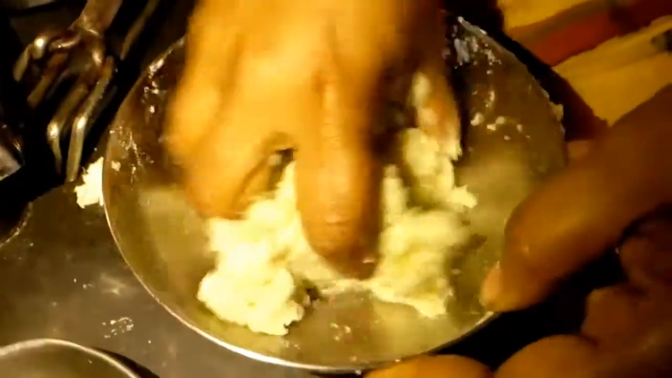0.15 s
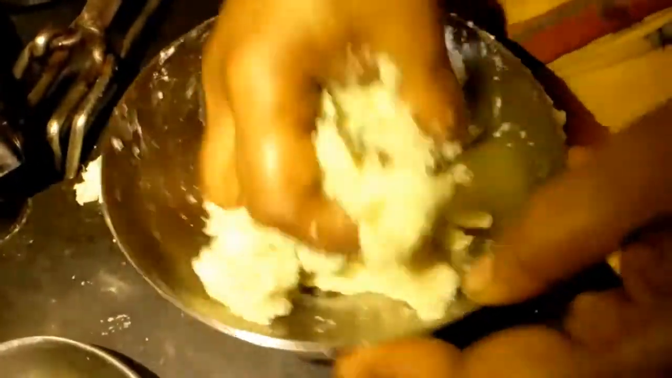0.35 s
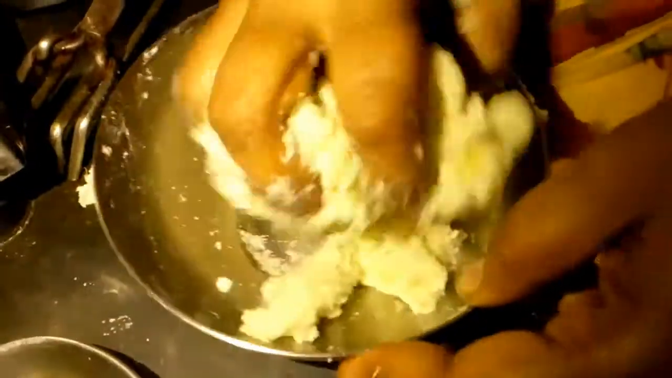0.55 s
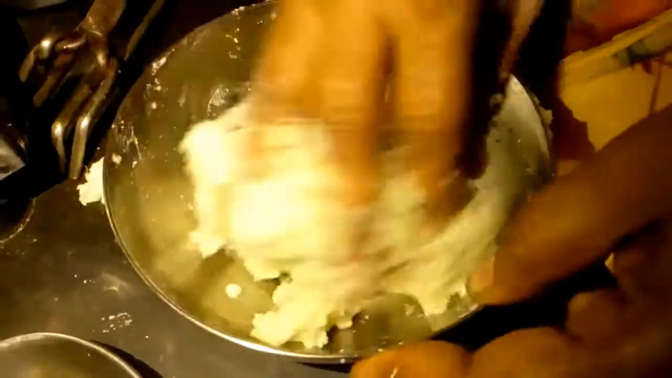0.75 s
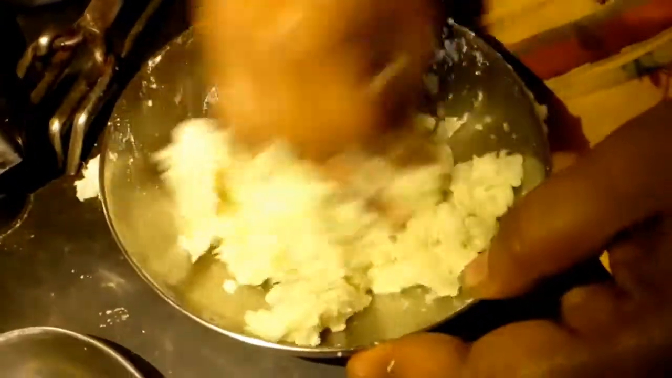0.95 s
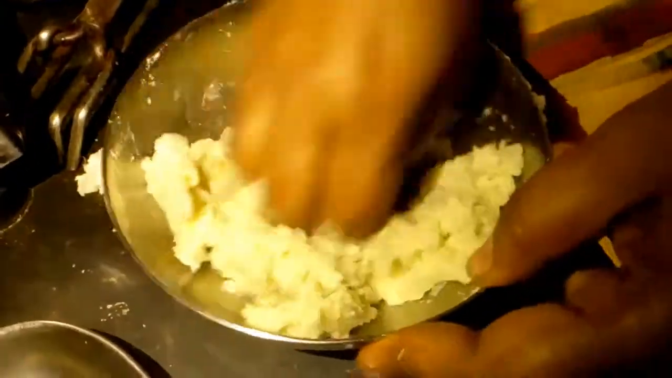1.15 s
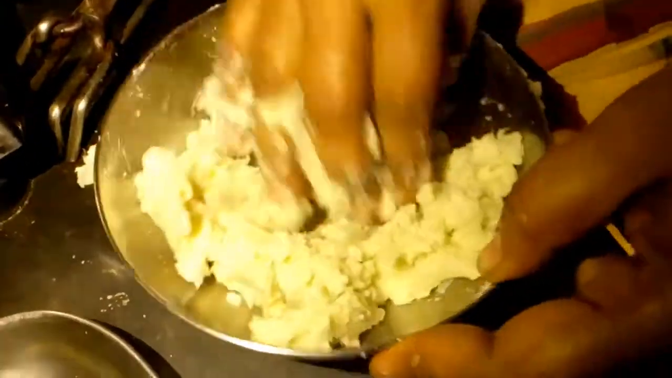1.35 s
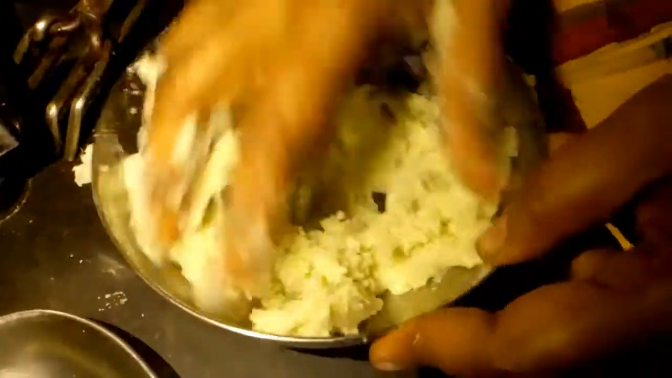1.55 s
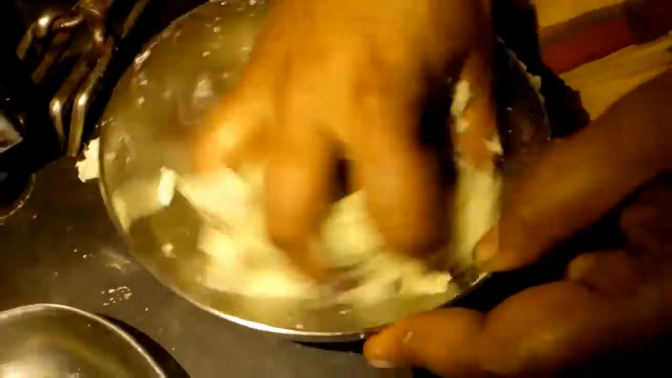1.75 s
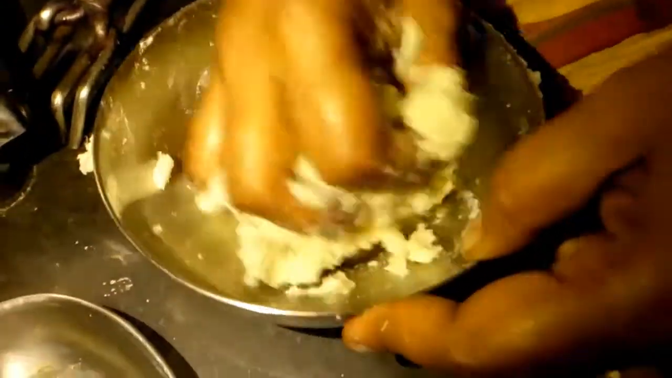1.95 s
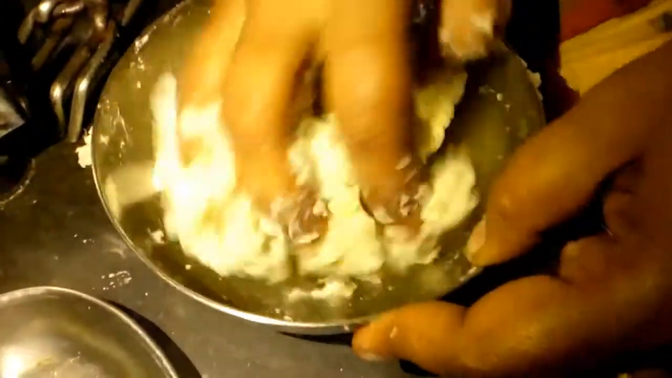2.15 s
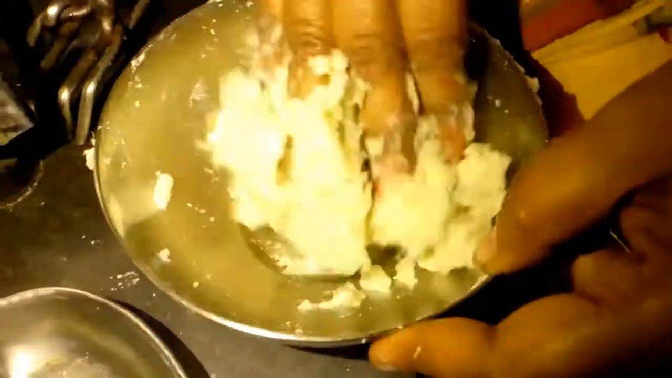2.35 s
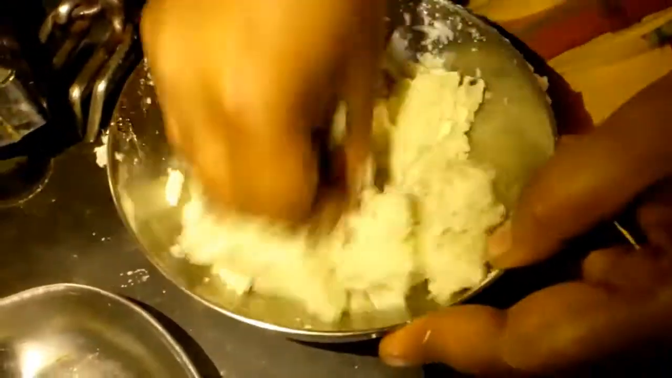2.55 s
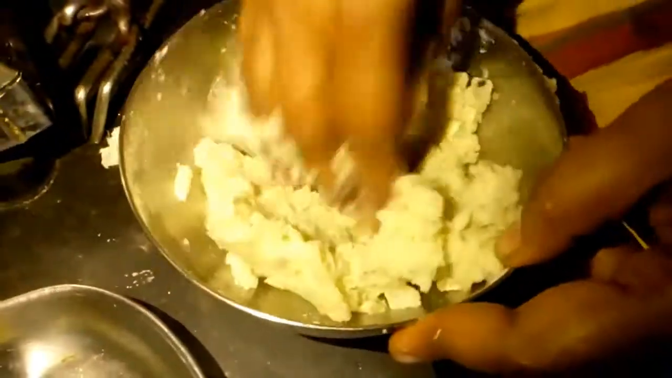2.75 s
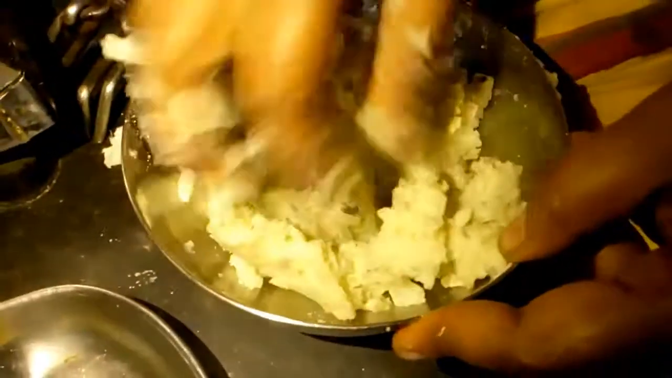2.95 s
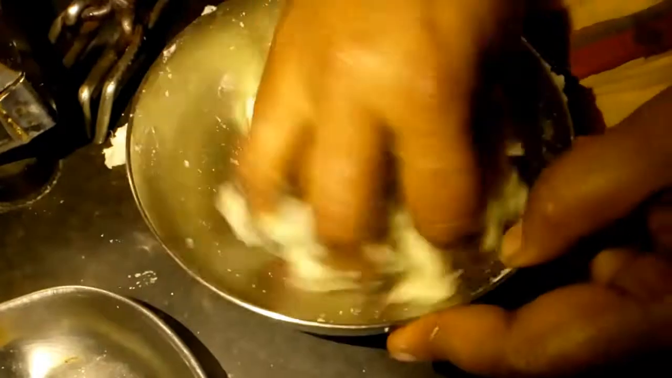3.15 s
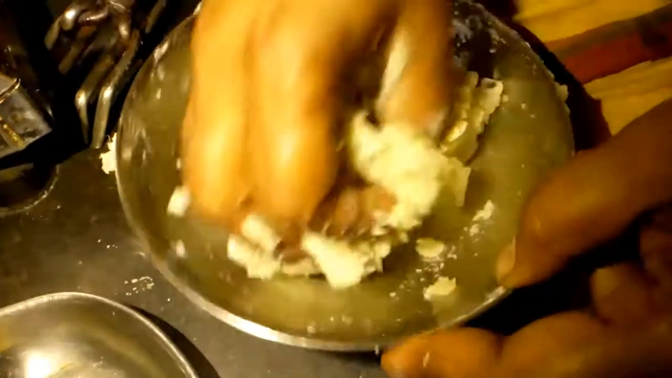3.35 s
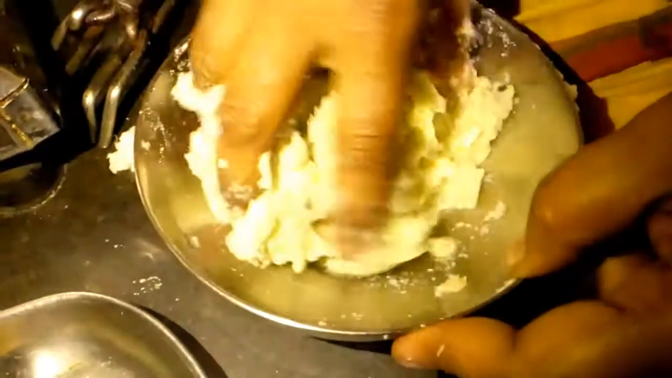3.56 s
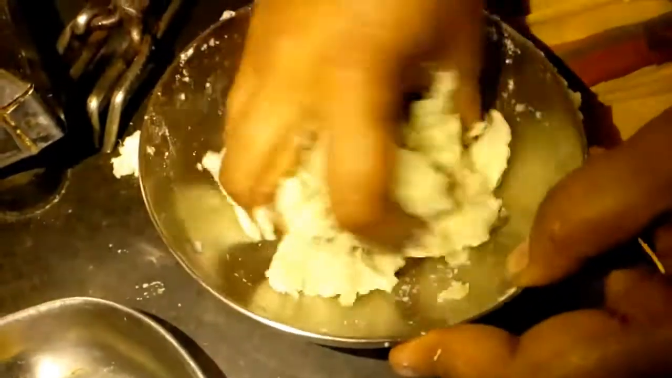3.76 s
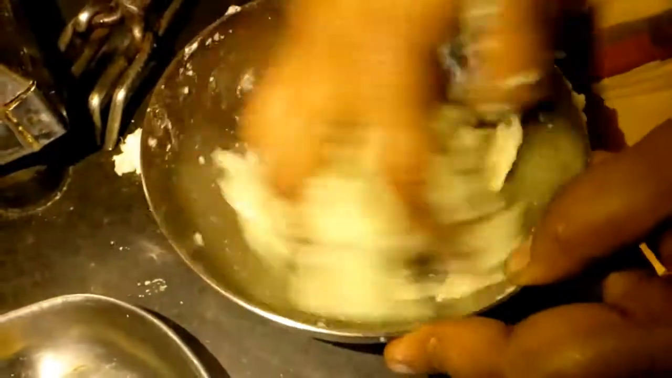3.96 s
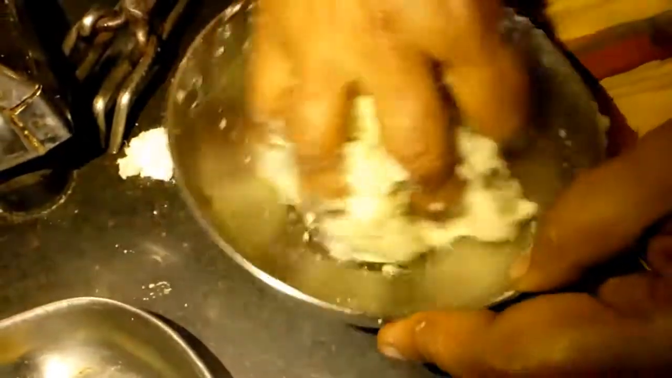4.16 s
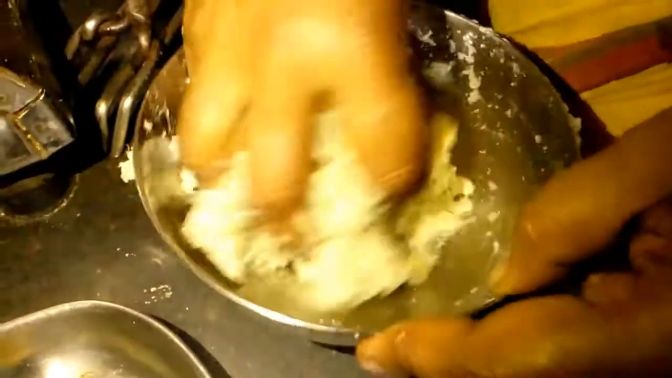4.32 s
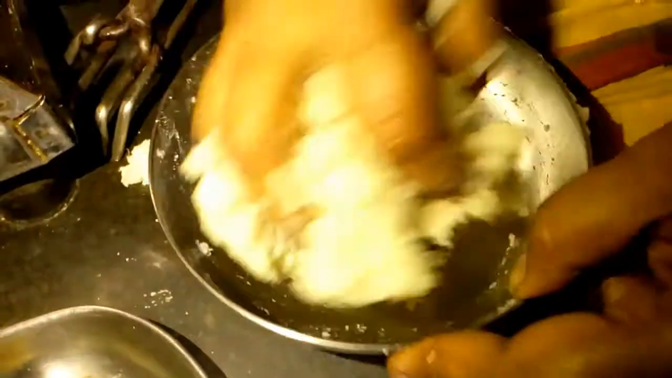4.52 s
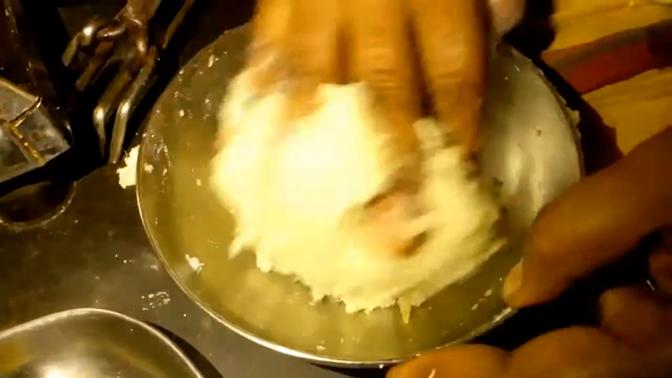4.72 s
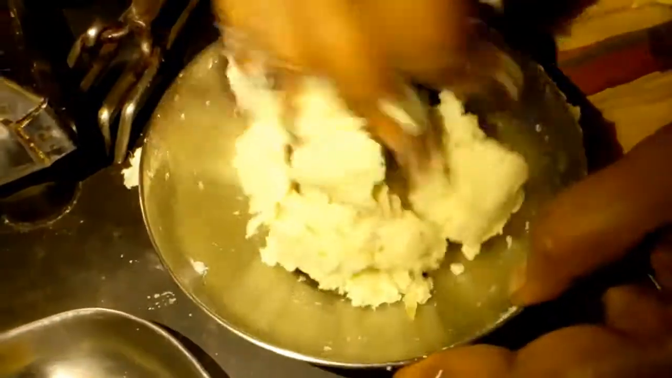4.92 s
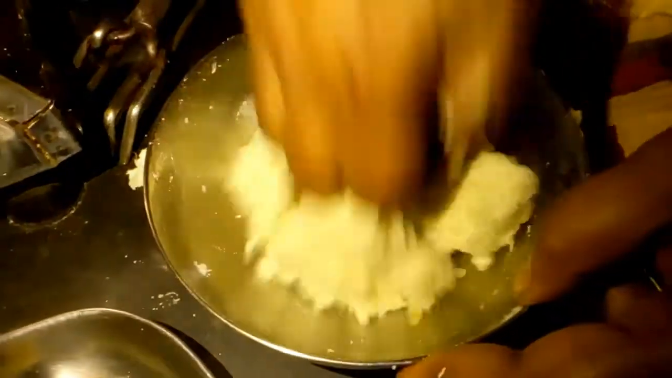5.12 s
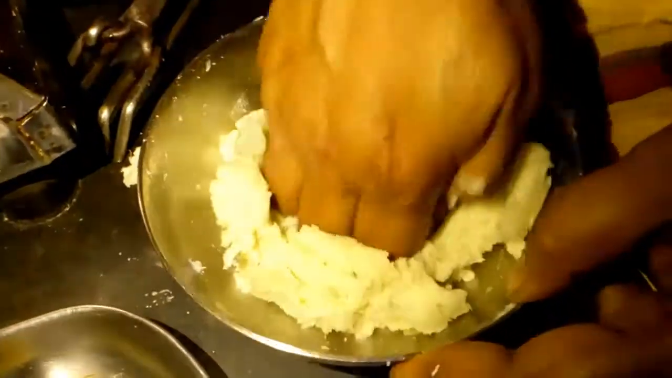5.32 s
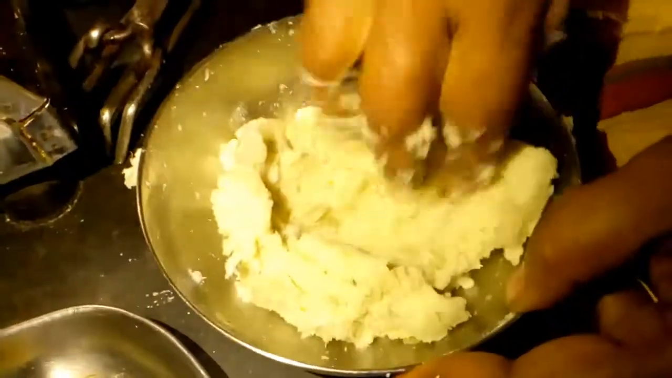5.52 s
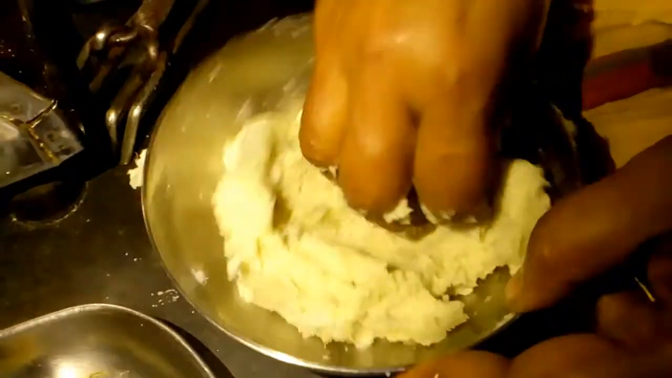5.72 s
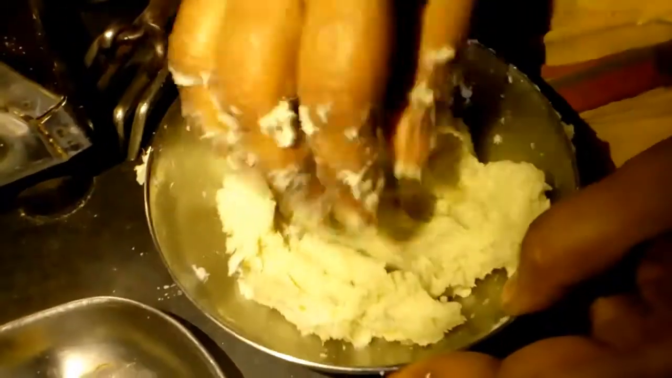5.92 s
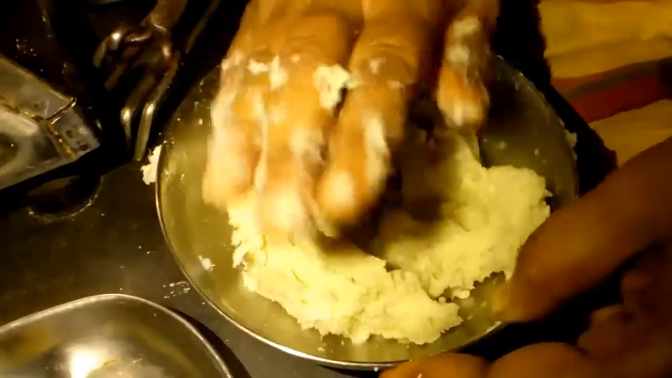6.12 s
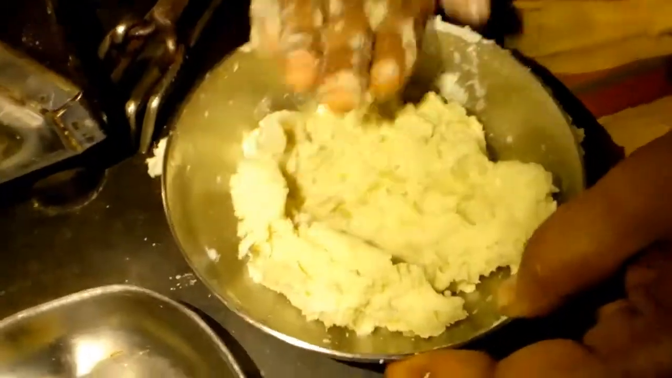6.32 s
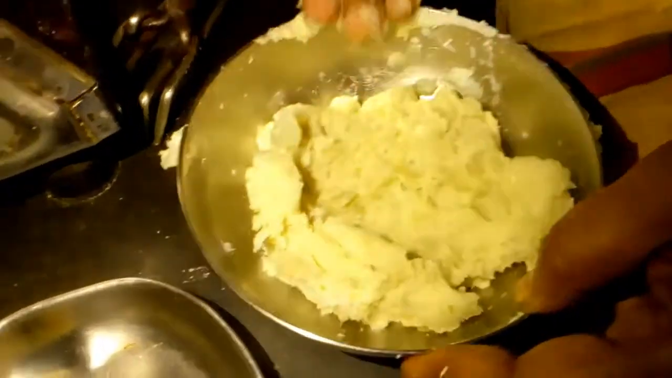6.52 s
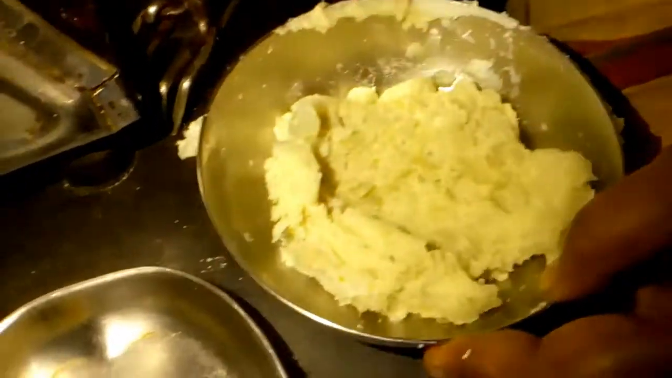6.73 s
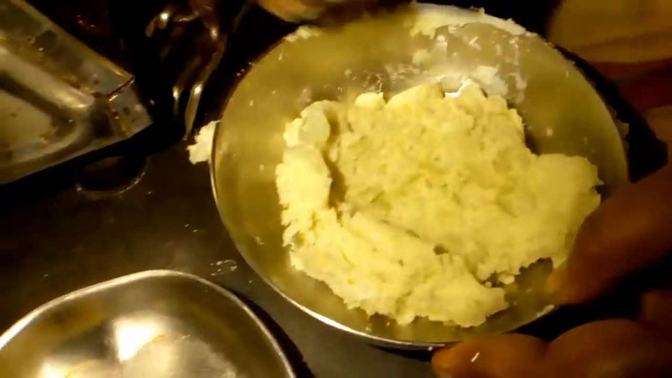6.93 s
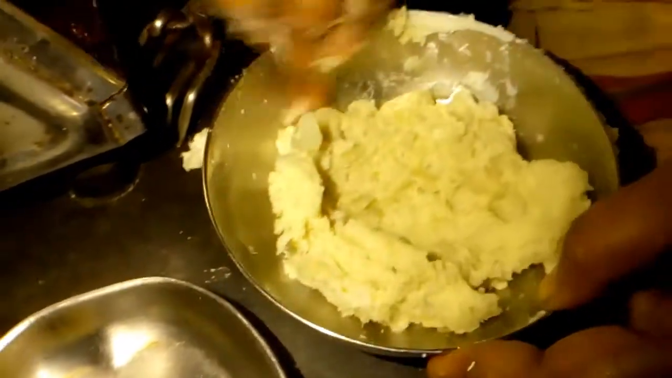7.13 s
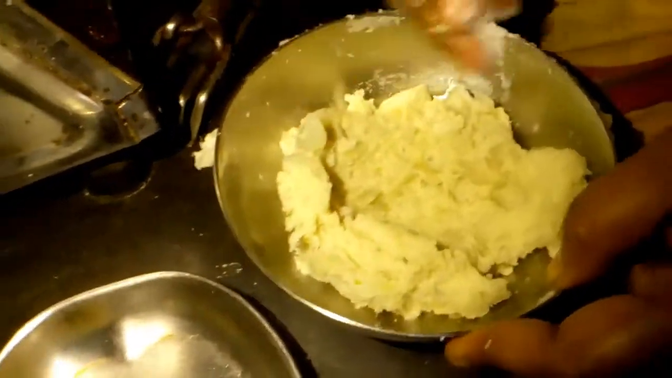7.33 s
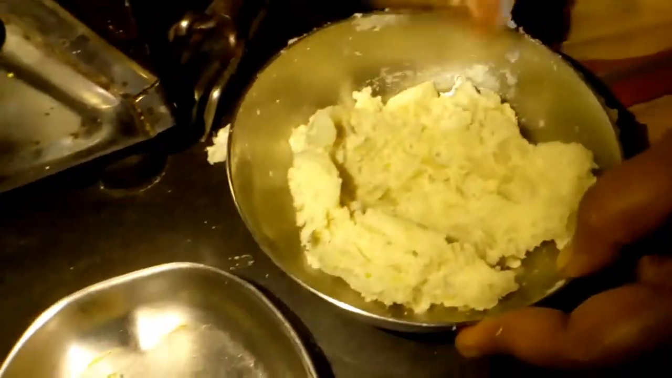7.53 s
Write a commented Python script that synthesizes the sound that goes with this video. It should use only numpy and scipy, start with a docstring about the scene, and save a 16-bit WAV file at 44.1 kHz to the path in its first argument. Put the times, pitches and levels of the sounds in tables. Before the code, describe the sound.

In a quiet kitchen a cricket keeps up a rapid, high chirping over low room noise. Close by, right of centre, a steel bowl taps and knocks irregularly against the counter as dough is worked in it, each ring quickly deadened. The dough rubs softly on the metal and now and then snaps off the fingers. Several harder knocks come in the second half, followed by a few gentler taps.

```python
"""A steel bowl rocks and knocks on a stone counter as a hand kneads crumbly dough in it.
Each knock rings the dough-damped bowl; dough rubs the steel and snaps as it unsticks from the fingers.
Behind it lie quiet kitchen tone, faint far whistles and a cricket beyond the wall, whose wing strokes
chirp in two falling syllables. A spaced pair of microphones hears the bowl to the right."""
import sys
import numpy as np
from scipy import signal
from scipy.fft import rfft, irfft, next_fast_len
from scipy.io import wavfile
from scipy.ndimage import uniform_filter1d

SR = 44100
rng = np.random.default_rng(int(sys.argv[2]) if len(sys.argv) > 2 else 0)


def unload_wav(signal):
    """Save mono or channel-first audio to the path in sys.argv[1] as 16-bit WAV at rate SR, clipped to [-1, 1]."""
    wavfile.write(
        sys.argv[1],
        SR,
        np.round(np.clip(np.atleast_2d(signal).T, -1, 1) * 32767).astype(np.int16),
    )


N = 338688
T = np.arange(N) / SR
FFT_SIZE = next_fast_len(N + SR)
HZ = np.arange(FFT_SIZE // 2 + 1) * SR / FFT_SIZE


def undb(db):
    """Decibels to gain."""
    return 10 ** (np.asarray(db) / 20)


def on_log(points, hz):
    """Reads a curve of (f/Hz, value) points on a log-frequency axis."""
    f, value = np.transpose(points)
    return np.interp(np.log(hz + 1), np.log(f), value)


def shape(x, gain):
    """Filters with one gain for each frequency in HZ."""
    return irfft(rfft(x, FFT_SIZE) * gain, FFT_SIZE)[..., :N]


def unit(x):
    """Scales to an RMS of 1."""
    return x / np.sqrt(np.mean(x ** 2))


def band(x, hz, width_hz):
    """A resonance of gain 1."""
    return signal.lfilter(*signal.iirpeak(hz, hz / width_hz, SR), x)


def steep_band(x, hz, width_hz):
    """The same resonance twice over, at an RMS of 1."""
    return unit(band(band(x, hz, width_hz), hz, width_hz))


def fade(t, t60):
    """A decay of 60 dB in t60 seconds."""
    return np.exp(-np.log(1000) * t / t60)


def add(track, start, sound):
    """Mixes a sound in at start seconds."""
    i = int(max(start, 0) * SR)
    track[i:i + len(sound)] += sound[:N - i]


def waver(rate_hz):
    """Random steps, smoothed twice, at an RMS of 1."""
    hold = int(SR / rate_hz)
    steps = np.repeat(rng.standard_normal(N // hold + 1), hold)
    return unit(uniform_filter1d(uniform_filter1d(steps, hold), hold)[:N])


def echo(x, t60, treble_t60, rise_s):
    """Diffuse kitchen echo, unrelated left and right; the treble dies sooner."""
    t = T[:SR // 2]
    noise = rng.standard_normal((2, len(t)))
    low = signal.lfilter(*signal.butter(1, 2000, fs=SR), noise)
    tail = (low * fade(t, t60) + (noise - low) * fade(t, treble_t60)) * (1 - np.exp(-t / rise_s))
    return shape(x, rfft(tail / np.sqrt(np.sum(tail ** 2) / 2), FFT_SIZE))


def room_tone():
    """A gently wavering bed of rumble and hiss, centred in the bass and wide above, with a drone."""
    # spectrum of the bed: f/Hz, relative level/dB
    colour = [(15, -35), (25, -8.5), (180, -0.5), (317, -2), (545, -10.5), (840, -8), (1070, -8.5),
              (3080, -15), (3720, -21), (5000, -14), (6210, -7.5), (7310, -25.5), (12200, -21.5),
              (14800, -32), (16000, -54.5)]
    # stereo image: f/Hz, left-right correlation
    likeness = [(60, 0.77), (290, 0.83), (700, -0.23), (1400, -0.3), (3000, -0.06)]
    # drone bands: f/Hz, width/Hz, level/dB
    drones = [(168.5, 18, -68), (820, 41, -67.5)]
    correlation = np.clip(on_log(likeness, HZ), -.95, .95)
    eq = undb(on_log(colour, HZ))
    mid = shape(rng.standard_normal(N), eq * np.sqrt(1 + correlation))
    side = shape(rng.standard_normal(N), eq * np.sqrt(1 - correlation))
    drone = sum(undb(db) * unit(band(rng.standard_normal(N), hz, width)) for hz, width, db in drones)
    return unit(np.array([mid + side, mid - side])) * undb(-53 + 0.67 * waver(6.1)) + drone


def whistles():
    """Thin far whistles and squeals: narrow bands of noise that swell and fade."""
    # whistles: start/s, end/s, f/Hz, width/Hz, level/dB, left minus right/dB
    cues = [(3.66, 4.24, 2790, 45, -56, 0), (3.72, 3.8, 3600, 60, -62, 0), (5.66, 5.79, 2300, 450, -52, 0),
            (5.89, 6.07, 3950, 130, -59, 0), (7.31, 7.45, 2550, 200, -61, 2),
            (7.33, 7.7, 2260, 260, -54.5, 2), (7.34, 7.43, 3550, 150, -62, 2),
            (7.38, 7.7, 3920, 130, -55.5, 2)]
    out = np.zeros((2, N))
    for start, end, hz, width, db, pan_db in cues:
        envelope = np.interp(T, [start, (3 * start + end) / 4, end - .04, end + .03], [0, 1, .85, 0])
        tone = steep_band(rng.standard_normal((2, N)), hz, width)
        out += undb(db + np.array([[pan_db], [-pan_db]]) / 2) * envelope * tone
    return out


def cricket():
    """Each wing stroke is a tone that falls in pitch; most of it arrives as echo."""
    # even runs of chirps, the beat slipping between them: first chirp/s, last chirp/s, level/dB
    runs = [(0.046, 0.178, -39), (0.309, 0.983, -39.5), (1.113, 1.906, -40), (2.036, 2.165, -40),
            (2.316, 2.85, -39.5), (2.983, 3.121, -40), (3.264, 4.329, -39.5), (4.446, 5.367, -40.5),
            (5.495, 6.021, -40.5), (6.155, 6.421, -41.5), (6.544, 6.946, -41), (7.077, 7.595, -41)]
    # the two wing strokes of a chirp: offset/s, length/s, relative level/dB
    strokes = [(-.002, 0.0135, -8), (0.018, 0.0165, 0)]
    period_s, from_hz, to_hz = .1325, 6524, 5223
    out = np.zeros(N)
    chirps = [(start, db) for first, last, db in runs
              for start in np.linspace(first, last, round((last - first) / period_s) + 1)]
    for start, db in chirps:
        scatter = rng.standard_normal((len(strokes), 2)) * [0.0078, 0.88]
        for (offset, length, stroke_db), (detune, scatter_db) in zip(strokes, scatter):
            progress = np.arange(int(length * SR)) / (length * SR)
            hz = (from_hz + (to_hz - from_hz) * progress) * (1 + detune)
            phase = 2 * np.pi * np.cumsum(hz) / SR
            # the scraper catches the teeth of the file unevenly
            catch = 1 + 0.1 * unit(band(rng.standard_normal(len(progress)), 350, 390))
            tone = catch * (np.sin(phase) + undb(-24) * np.sin(2 * phase))
            envelope = np.sin(np.pi * progress ** 0.48) ** 1.75
            add(out, start + offset, undb(db + stroke_db + scatter_db) * envelope * tone)
    direct = np.array([undb(5) * np.roll(out, 9), undb(7) * out])  # later and softer on the left
    return direct + undb(9.5) * echo(out, t60=0.19, treble_t60=0.14, rise_s=0.008)


def dough_rub():
    """Crumbs dragged over steel make dense, uneven grains that flutter in level."""
    # swells of the rubbing: t/s, level/dB
    swells = [(0.0, -65), (0.44, -55), (0.61, -48.5), (0.77, -82), (1.06, -56), (1.2, -59), (1.5, -68),
              (2.15, -62), (2.46, -69), (2.78, -56.5), (3.15, -70), (3.3, -67), (3.57, -63.5), (4.1, -60.5),
              (4.6, -64.5), (4.78, -90), (5.36, -85), (5.47, -62), (5.77, -61), (6.05, -70.5), (6.42, -77),
              (6.63, -92), (6.9, -77)]
    # spectrum of the friction: f/Hz, relative level/dB
    colour = [(300, 3), (1000, -0.5), (3000, 3), (5000, -5.5), (8000, -9), (12000, -11), (15000, -16.5)]
    grains = rng.standard_normal(N) * undb(1.3 * rng.exponential(size=N))
    flutter = undb(4 * waver(30))
    friction = unit(shape(grains * flutter, undb(on_log(colour, HZ))))
    times, db = np.transpose(swells)
    return friction * undb(np.interp(T, times, db, right=-120))


def dough_snaps():
    """Dough lets go of skin: a bright burst of air, a small cavity under it, a sticky crackle after."""
    # snaps: t/s, level/dB, cavity f/Hz, cavity and crackle trim/dB
    cues = [(1.0874, -32.5, 1550, -8), (1.219, -19, 2490, -20.5), (2.672, -31, 2700, -23.5),
            (2.7, -55, 2330, 0.5), (2.8142, -48.5, 1680, -2), (3.244, -16, 1400, -19),
            (3.258, -28, 1370, -22), (3.331, -27.5, 2060, -20.5), (3.386, -51, 2170, -34),
            (4.4707, -45.5, 1340, -15)]
    # resonances of the air burst: f/Hz, width/Hz, gain/dB
    air_bands = [(10000, 400, -8.5), (11800, 1100, -11.5), (4800, 6400, -13)]
    out, t = np.zeros(N), T[:SR // 4]
    for start, db, cavity_hz, cavity_db in cues:
        noise = rng.standard_normal((2, len(t)))
        burst = noise[0] * (1 - np.exp(-t / 0.0026)) * (fade(t, 0.017) + 0.039 * fade(t, 0.21))
        air = band(burst, 14030 + 60 * db, 1040)  # louder snaps are brighter
        air += sum(undb(band_db) * band(burst, hz, width) for hz, width, band_db in air_bands)
        cavity = steep_band(noise[1], cavity_hz, 240) * fade(t, 0.029)
        crackle = unit(band(noise[1] ** 3, 2200, 4200)) * fade(t, 0.43)
        snap = undb(12) * air + undb(cavity_db + 11) * cavity + undb(cavity_db - 7.5) * crackle
        add(out, start, undb(db) * snap)
    return out


def bowl_modes(t, bass_db, body_db, shell_db, clack_db):
    """The low and the high modes of the steel bowl, voiced for one contact."""
    # dough-damped modes: f/Hz, level/dB, t60/s
    modes = [(96.6, -14, 0.23), (175.6, -2, 0.16), (314.6, -3, 0.13), (401.7, -5, 0.12), (520.5, 1.5, 0.17),
             (591, -8.5, 0.068), (803, 1, 0.13), (895, -5, 0.09), (998, -5, 0.045), (1134, -3.5, 0.049),
             (1242, -1.5, 0.036), (1415, -2.5, 0.037), (1688.5, -1.5, 0.03), (1904, -16, 0.034),
             (2470, -0.5, 0.022), (2878, -7.5, 0.019), (3380, -10, 0.015), (4560, -7, .012)]
    hz, mode_db, t60 = np.transpose(modes)[:, :, None]
    level_scatter, pitch_scatter = rng.standard_normal((2, len(modes), 1))
    voicing = [(200, bass_db + 11.5), (300, body_db), (600, body_db),
               (780, shell_db), (2000, shell_db + 14), (2400, clack_db)]
    gain = undb(mode_db + on_log(voicing, hz) + 1.5 * level_scatter)
    swell = 1 - np.exp(-t * hz / 1.68)  # low modes take longer to sound in full
    detuned_hz = hz * (1 + .012 * pitch_scatter)  # the dough detunes the shell at every blow
    partials = gain * swell * fade(t, t60) * np.sin(2 * np.pi * detuned_hz * t)
    is_low = hz[:, 0] < 950
    return partials[is_low].sum(axis=0), partials[~is_low].sum(axis=0)


def bowl_knocks():
    """A blow, then the settling base, drive the bowl; a ring, a clack and a crack mark the contact."""
    # bowl knocks on the counter, scrapes, or rings softly as dough rubs it: t/s, level/dB, ring f/Hz,
    # clack f/Hz, bass trim/dB, body trim/dB, clack trim/dB, rise/s, settling t60/s
    cues = [(0.004, -12, 925, 2820, -24.5, -13, -14, 0.00082, 0.086),
            (0.557, -9.5, 1047, 2803, -33, -9.5, -12.5, 0.00059, .11),
            (0.694, -10.5, 1080, 2320, -25, -11, -10, 0.0004, .12),
            (1.512, -31.5, 1240, 2500, -42, -25, -23, 0.0012, .1),
            (1.53, -15, 1180, 2650, -30.5, -8, -22, 0.00057, 0.11),
            (1.693, -33, 1260, 2690, -20.5, -14.5, -35, 0.0012, 0.31),
            (1.929, -64.5, 1460, 3400, -1, 17, -18, .012, 0.72),
            (2.195, -13.5, 905, 2800, -43, -20, -17, 0.0011, 0.1),
            (2.219, -20.5, 890, 2650, -38, -15, -13.5, 0.0012, 0.24),
            (2.406, -38, 1090, 2310, -16, -12, -22, 0.0013, 0.28),
            (2.614, -32.5, 1390, 2170, -27.5, -28, -6, 0.00076, 0.93),
            (2.872, -31.5, 1020, 2420, -38, -16, -16, 0.0016, .15),
            (2.886, -18, 1180, 2440, -27.5, -4.5, -43, 0.00097, 0.08),
            (3.115, -45, 1090, 2420, -27, 1.5, 2.5, 0.00093, 0.55),
            (3.163, -18, 1980, 2310, -28, -11.5, -15, .0007, 0.13),
            (3.175, -10.5, 950, 2250, -24, -15, -8.5, 0.0006, .22),
            (3.514, -2, 1198, 3025, -29.5, -19.5, -11, 0.00098, 0.35),
            (4.035, -24.5, 1410, 2740, -40, -14.5, -23, 0.0012, 0.24),
            (4.31, -27, 1150, 2300, -30, -21, -12.5, .045, 0.13),
            (4.547, -17.5, 1020, 2940, -25, 1, -10, .014, 0.1),
            (4.631, -30.5, 1230, 2900, -19.5, -12, -14, 0.0037, 0.15),
            (4.646, -3.5, 1080, 2895, -30.5, -19, -16.5, 0.0017, 0.11),
            (4.744, -16, 990, 2370, -33, -19.5, -28, .002, 0.088),
            (4.849, -34, 1300, 2610, -21, -21, -21, 0.01, 0.1),
            (5.067, -2.5, 1294, 3020, -37, -19, -36, 0.0014, 0.16),
            (5.492, -40, 900, 2500, -22, -5, -30, 0.00174, 0.11),
            (5.506, -26, 1200, 2610, -14.5, 2.5, -10, 0.0008, 0.12),
            (5.815, -29, 1230, 2330, -4, -18, -5, 0.0024, .08),
            (5.829, -3, 1090, 2960, -26, -21.5, -18, 0.00078, 0.23),
            (6.163, -26, 1180, 2320, -38, -13, -35, 0.0014, 0.21),
            (6.415, -20.5, 1830, 2640, -29, -31, -24, 0.00087, 0.25),
            (6.528, -29, 1830, 2680, -21.5, -18, -8, 0.0028, 0.2),
            (6.554, -23, 1880, 2650, -41, -29, -13, .0013, .14),
            (7.183, -37.5, 1090, 2370, 2, 6, -29, .015, .11)]
    out, t = np.zeros(N), T[:SR // 2]
    for start, db, ring_hz, clack_hz, bass_db, body_db, clack_db, rise, settle in cues:
        shell_db = -7.5 + 0.53 * body_db  # the shell follows the body in part
        low, high = bowl_modes(t, bass_db, body_db, shell_db, clack_db)
        noise = rng.standard_normal((3, len(t)))
        onset = (1 - np.exp(-t / rise)) ** 2
        blow = np.exp(-rise / 0.011)  # a slow push or rub has no sharp blow
        # later bounces are softer, so they reach the high modes for a shorter time
        low_drive, high_drive = onset * fade(t, settle), onset * fade(t, 0.59 * settle)
        settling = signal.fftconvolve(low, 0.039 * noise[0] * low_drive)
        settling += signal.fftconvolve(high, 0.033 * noise[0] * high_drive)
        bowl = blow * onset * (low + high) + settling[:len(t)]

        # the counter adds a dense, pitchless rattle and thud
        rattle = unit(band(band(band(noise[1], 1370, 1000), 790, 1230), 1230, 1400)) * high_drive
        thud = steep_band(noise[2], 500, 350) * onset * fade(t, 1.18 * settle)
        counter = undb(shell_db + 1) * rattle + undb(body_db - 4) * thud

        scrape = steep_band(noise[2], ring_hz, 430)
        ring = blow * np.sin(2 * np.pi * ring_hz * t) + (1 - blow) * scrape
        ring *= onset * fade(t, 0.012 + 4 * rise)
        clack = np.sin(2 * np.pi * clack_hz * t) + .5 * steep_band(noise[1], clack_hz, 1500)
        clack *= onset * fade(t, 0.016 + 3 * rise)
        crack = blow * unit(band(band(noise[2], 9200, 7300), 4100, 6700)) * fade(t, 0.018)
        crack_db = clack_db - 6 + 3.5 * db  # a harder blow cracks much louder
        contact = undb(2) * ring + undb(clack_db + 3.5) * clack + undb(crack_db) * crack
        add(out, start + 0.00078 - rise, undb(db) * (undb(-5.5) * (bowl + counter) + contact))
    return signal.sosfilt(signal.butter(3, 75, "high", fs=SR, output="sos"), out)


def scene():
    """Bowl and dough close on the right, with their echo, over the background."""
    near = bowl_knocks() + dough_snaps() + dough_rub()
    # the bowl reaches the left microphone later and duller: f/Hz, gain/dB
    left_eq = [(100, -3), (300, -1.5), (1000, -7.5), (3000, -11.5), (8000, -28), (13000, -14)]
    left_lag_s = 0.00026
    left = shape(near, undb(on_log(left_eq, HZ)) * np.exp(-2j * np.pi * HZ * left_lag_s))
    # the long bass waves reach both microphones alike, so only the rest is diffuse
    send = signal.lfilter(*signal.butter(2, 200, "high", fs=SR), near)
    wet = echo(send, t60=0.28, treble_t60=0.2, rise_s=0.005)
    return undb(7) * np.array([left, near]) + undb(-6) * wet + cricket() + whistles() + room_tone()


def record(dry):
    """Peaks clip at full scale and the top is cut."""
    return signal.sosfilt(signal.ellip(8, .2, 70, 15700, fs=SR, output="sos"), np.clip(dry, -1, 1))


dry = scene()
out = record(dry)
unload_wav(out)
```